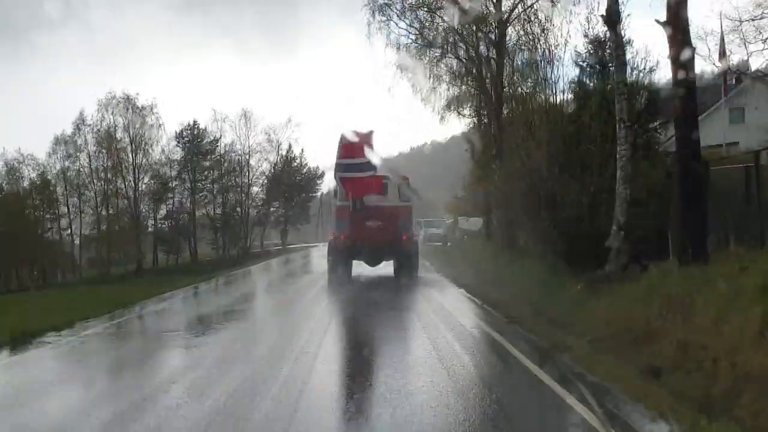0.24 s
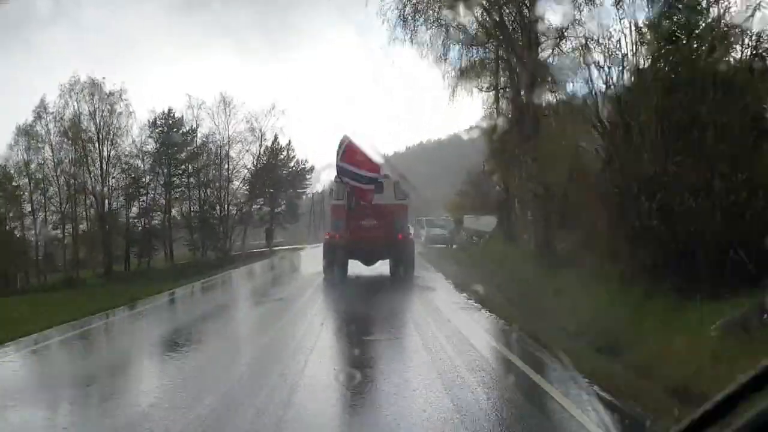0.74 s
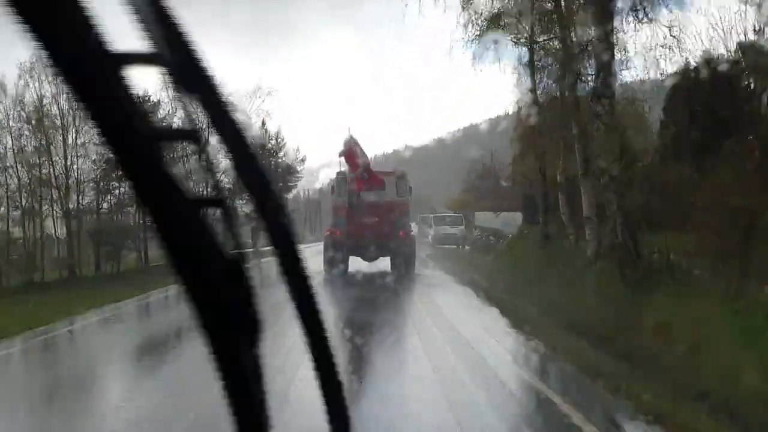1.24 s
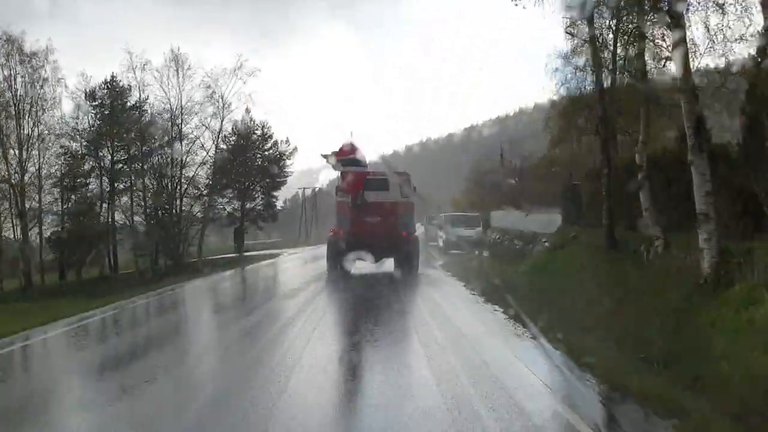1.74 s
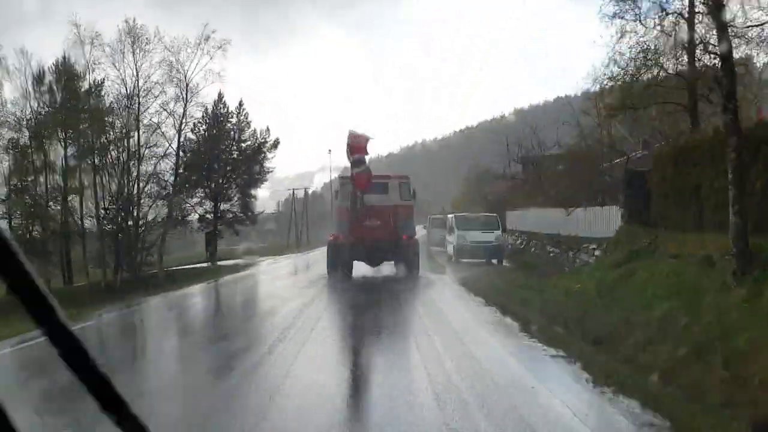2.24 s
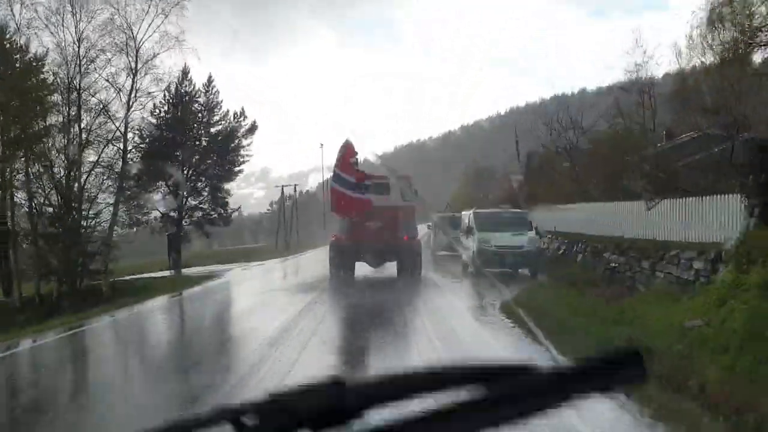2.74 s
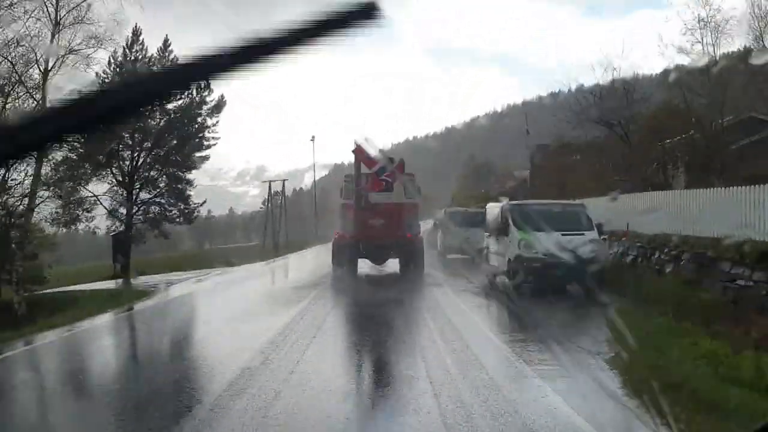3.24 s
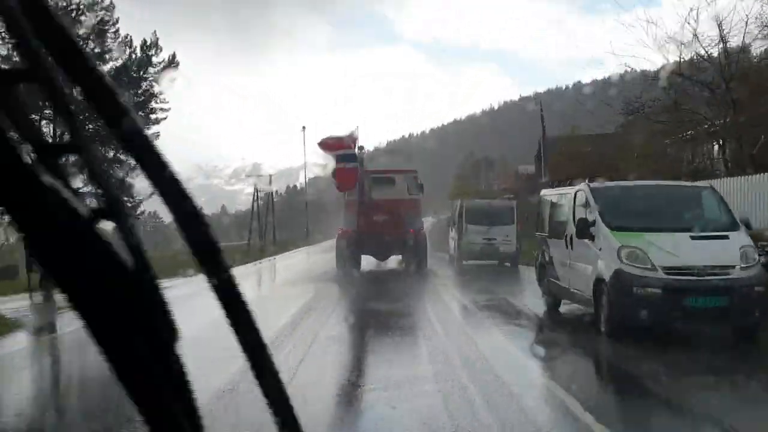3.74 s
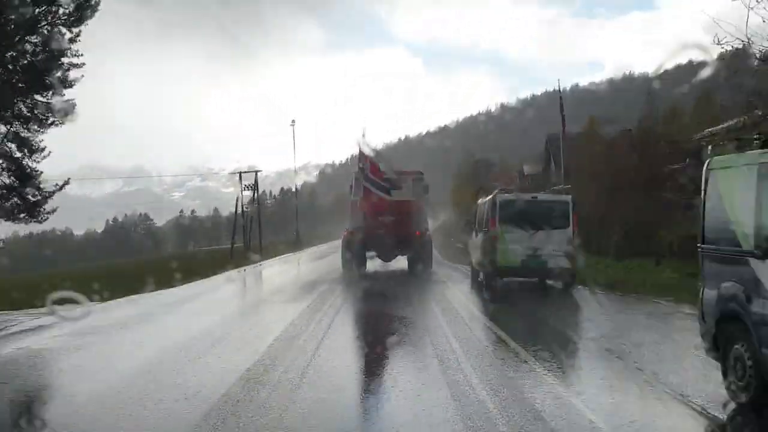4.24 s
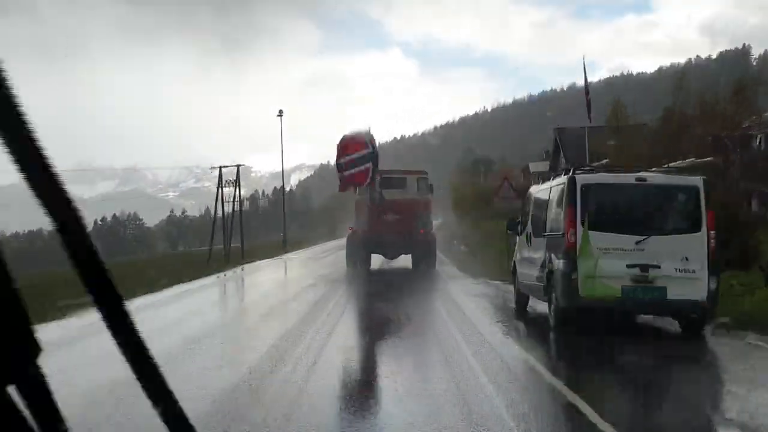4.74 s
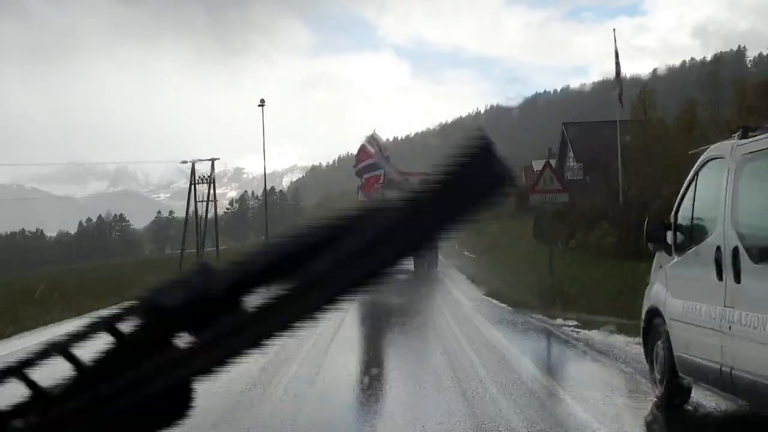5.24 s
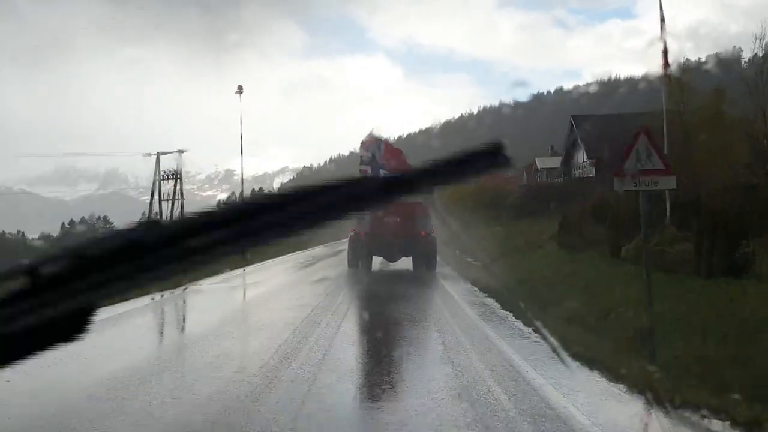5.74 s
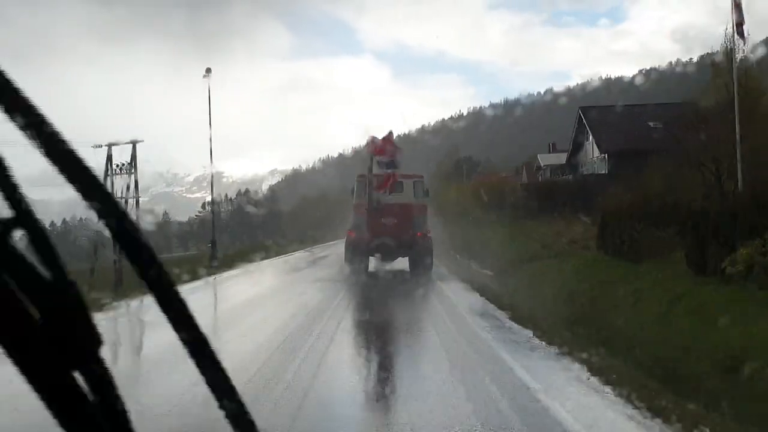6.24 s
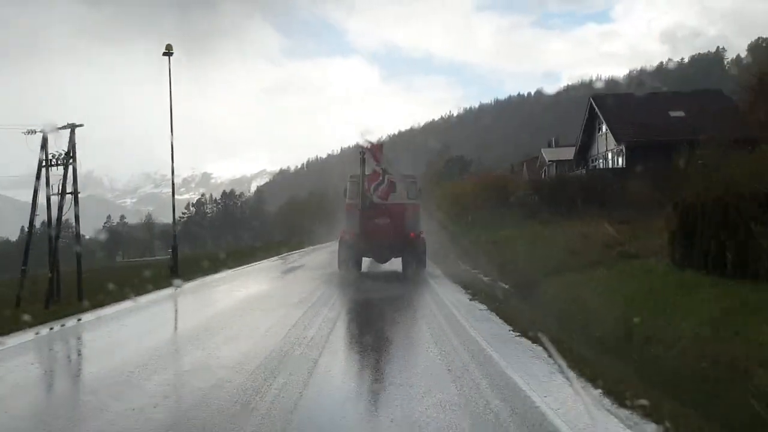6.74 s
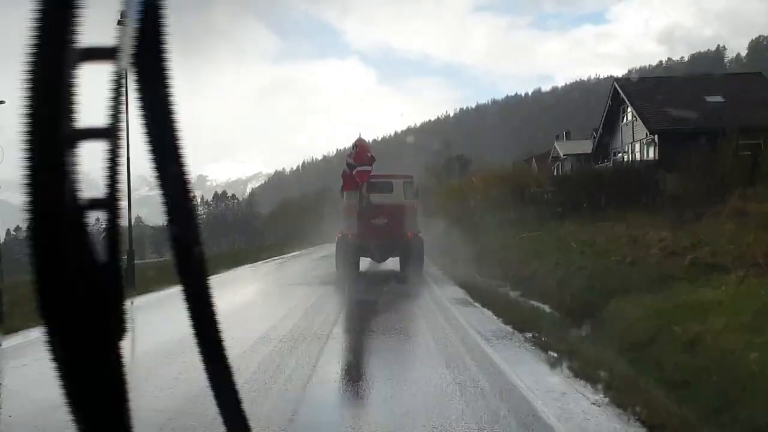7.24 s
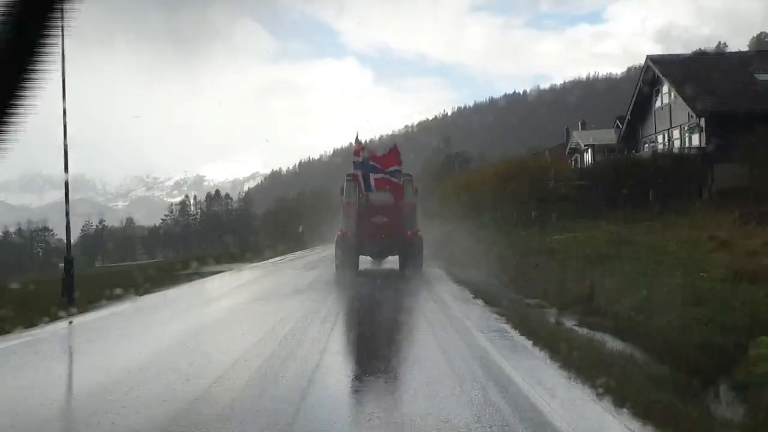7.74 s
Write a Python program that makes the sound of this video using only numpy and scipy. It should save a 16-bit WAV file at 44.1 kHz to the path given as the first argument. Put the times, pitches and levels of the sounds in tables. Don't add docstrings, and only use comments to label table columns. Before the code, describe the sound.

Rain patters and clicks on a car's windscreen above deep tyre roar and bump thuds, with rubbery wiper shudders and dull knocks repeating.

```python
import sys
import numpy as np
from scipy import signal
from scipy.fft import rfft, irfft
from scipy.io import wavfile
from scipy.ndimage import uniform_filter1d

SR = 44100
rng = np.random.default_rng(int(sys.argv[2]) if len(sys.argv) > 2 else 0)


def wav_record(signal):
    frames = np.transpose(np.atleast_2d(signal))
    bounded = np.clip(frames, -1, 1)
    quanta = np.round(bounded * 32767).astype(np.int16)
    wavfile.write(sys.argv[1], SR, quanta)


def volts(x):
    e = np.asarray(x, float) / 20
    return 10 ** e


N = 352800
TIME, FREQ = np.arange(N) / SR, np.fft.rfftfreq(N, 1 / SR) + 1

# pitch_hz, likeness [-1 to 1]
MIC_LIKENESS = [(60, 1), (130, 0.84), (290, 0.9), (640, 0.3), (1410, -0.24), (3100, 0.026), (6820, -0.071),
                (15000, 0.027)]
# pitch_hz, left_minus_right_db
MIC_LEAN = [(60, 1), (110, 3.5), (200, 0.5), (380, 2.5), (700, 1.5), (1290, 1.5), (2380, 2.5), (4400, 4.5),
            (8120, -1), (15000, -3.5)]
# start_s, firing_rate_hz, level_db
ENGINE = [
    (0, 71.9, -43),
    (3.3, 71.3, -39),
    (3.55, 72.9, -33.5),
    (4.5, 72.4, -23.5),
    (5.6, 71.6, -24),
    (6.5, 73.64, -23.5),
    (7.0, 72.84, -24),
    (7.3, 75.4, -35),
    (8, 74.5, -35),
]
# multiple, level_db
ENGINE_ORDERS = [(1, -2), (2, -16.5)]
# start_s, pitch_hz
BOOM_PITCH = [(0, 59.5), (.5, 60.5), (1.1, 65), (2, 64), (2.6, 61.5), (3.3, 65.5), (4, 63), (4.7, 61),
              (5.7, 65), (6.3, 62), (7.2, 62), (7.6, 64), (8, 62)]
# start_s, peak_db, hold_s
BUMPS = [(0, -21, 0.079), (0.15, -23, 0.1), (0.387, -16.5, 0.04), (0.54, -20, 0.04), (0.67, -21, 0.26),
         (1.0, -30, 0.082), (1.277, -13.5, 0.019), (1.75, -28, 0.21), (1.993, -14.5, 0.029),
         (2.271, -20.5, .01), (2.427, -28, .01), (2.554, -18.5, .02), (2.865, -18.5, 0.043),
         (3.21, -23, 0.025), (3.258, -19, 0.12), (3.747, -24, 0.36), (4.35, -27, 0.023),
         (4.525, -14, 0.0077), (4.706, -25.5, 0.38), (5.073, -21, 0.0092), (5.353, -19.5, 0.044),
         (5.691, -14.5, 0.024), (5.874, -18.5, 0.14), (6.21, -27, 0.33), (6.598, -26, 0.35),
         (7.04, -19, 0.23), (7.292, -22.5, 0.24)]
# pitch_hz, level_db [dB per Hz]
ROAD_COLOUR = [(15, -59), (25, -24), (46, -9.5), (63, -5), (75, -8.5), (86, -7.5), (101, -15.5), (135, -14),
               (168, -21.5), (205, -13), (243, -24.5), (376, -22), (545, -29), (613, -28.5), (983, -36),
               (1400, -42.5), (1820, -46.5), (3080, -120)]
# start_s, level_db
TYRE_LOAD = [(0.0, -33.5), (1.2, -31.5), (1.6, -33), (1.98, -30.5), (2.2, -32.5), (2.45, -33), (2.7, -33),
             (3.08, -33.5), (3.3, -30), (3.7, -34.5), (4.05, -34), (4.42, -31), (5.3, -33), (5.77, -31.5),
             (6.75, -33), (7.02, -31.5), (7.55, -32.5), (8.0, -33)]
# start_s, level_db
SHOWER = [(0.0, -44), (0.31, -47), (0.44, -43.5), (2.23, -43.5), (2.47, -41), (3.12, -45), (3.96, -48),
          (4.84, -45), (5.1, -48.5), (5.61, -44.5), (6.51, -46), (6.91, -44), (7.24, -46.5), (7.64, -44.5),
          (8.0, -47)]
# pitch_hz, level_db [dB per Hz]
RAIN_COLOUR = [(760, -12), (1300, -1), (2320, -1.5), (2950, -2), (4780, -5), (6830, -11.5), (8890, -23.5),
               (11300, -16.5), (13400, -18.5), (15200, -19), (16000, -38)]
# pitch_hz, t60_s
DROP_T60 = [(1500, 0.2), (4000, 0.076), (11000, 0.055)]
# start_s, peak_db, ring_hz, treble_minus_peak_db
GLASS_DROPS = [(0.065, -29, 2810, -16), (0.23, -26.5, 2980, -33), (0.2753, -25, 3230, -18),
               (0.2977, -25.5, 3000, -20), (0.3298, -23, 2030, -27), (0.4419, -27, 2120, -19),
               (0.5134, -23.5, 2750, -12), (0.6739, -23, 3970, -32), (0.7045, -26, 2990, -32),
               (0.7612, -28, 2266, -32), (0.8604, -26, 3010, -20), (0.932, -27, 2600, -20),
               (1.04, -21, 2630, -18), (1.2142, -26, 2900, -23), (1.2825, -25, 3720, -25),
               (1.3344, -28, 4290, -26), (1.3768, -46, 2910, -16), (1.5083, -25.5, 2490, -19),
               (1.5748, -30, 3690, -15), (1.6182, -25.5, 3000, -30), (1.7257, -20, 2680, -13),
               (1.8991, -28, 2960, -23), (1.933, -28.5, 2860, -18), (2.2638, -30.5, 3100, -17),
               (2.3219, -19, 2110, -20), (2.7043, -27, 2970, -15), (2.8409, -28, 2790, -14),
               (2.8726, -29, 2730, -23), (3.177, -27, 3210, -17), (3.457, -22, 3120, -24),
               (3.8085, -28.5, 2020, -16), (4.5805, -33, 2710, -24), (4.5925, -26.5, 2050, -23),
               (4.7331, -31.5, 2700, -14), (5.0764, -29.5, 3012, -16), (5.7728, -26, 4640, -29),
               (6.0831, -32, 2450, -26), (6.182, -24.5, 2850, -22), (6.7131, -24.5, 4590, -18),
               (6.8029, -26, 4340, -19), (7.1751, -21.5, 2140, -23)]
# start_s, peak_db, treble_minus_peak_db
ROOF_DROPS = [(0.316, -25.5, -12), (1.1854, -30, -9), (1.408, -27, -12), (2.166, -26, -26),
              (3.261, -29, -11), (3.391, -28, -26), (3.704, -30, -28), (4.2168, -26.5, -21),
              (4.6966, -28, -9), (5.666, -22, -35), (5.8376, -21, -24), (6.822, -30, -7)]
# start_s, peak_db
MORE_GLASS_DROPS = [(.2613, -31), (1.149, -31), (1.563, -36), (1.7679, -35), (1.7998, -28.5), (.408, -38),
                    (2.284, -31), (2.3057, -40), (2.395, -30), (2.9844, -31.5), (3.34, -34), (3.5974, -30),
                    (3.8725, -29), (4.146, -31.5), (4.338, -31.5), (4.537, -32), (4.779, -31), (4.878, -28),
                    (5.5258, -38), (5.906, -28), (5.9377, -28.5), (6.928, -30.5), (7.237, -33), (7.574, -33),
                    (7.898, -33)]
# start_s, peak_db, upper_modes_minus_peak_db
KNOCKS = [(0.322, -22, -33), (0.549, -13.5, -20.5), (1.807, -16.5, -17.5), (2.246, -37, -23),
          (3.068, -14, -18.5), (3.721, -21, -17), (3.775, -16.5, -24), (4.327, -13.5, -19.5),
          (5.595, -17.5, -15), (5.991, -43, -29), (6.229, -25, -10), (6.861, -14.5, -18), (7.017, -17, -20),
          (7.569, -17.5, -23)]
# pitch_hz, level_db, swell_s
KNOCK_MODES = [(124.3, 2, 0.0063), (184.4, -11, 0.018), (313.3, 5.5, 0.0046), (585, -6.5, 0.0029)]
# start_s, pitch_hz, level_db, hold_s
SQUEAKS = [(0.903, 597, -38, .02), (1.114, 850, -36, .02), (1.105, 1650, -44, .01),
           (1.108, 2000, -44, .012), (1.146, 2330, -43, 0.013), (2.338, 2190, -43, 0.018),
           (2.383, 1566, -43, 0.027), (3.09, 1625, -43, 0.018), (3.258, 900, -30, 0.0071),
           (3.261, 1100, -38, .01), (3.623, 612, -34, .055), (3.62, 1570, -46, 0.059),
           (3.667, 1800, -37, .025), (4.911, 2298, -44, 0.035), (4.913, 843, -37, 0.043),
           (6.128, 2250, -44, .01), (7.4, 2250, -43, 0.008)]
# start_s, peak_db,
# groan_minus_peak_db, film_hiss_minus_peak_db
SCRAPES = [(0.904, -32, -4, -12), (0.9134, -31, -9, -5), (0.9294, -32, -13, -4), (1.0947, -21, -4, -19),
           (1.106, -22, -7, -15), (1.129, -28.5, 4, -19), (1.1465, -23, 1, -17), (1.1564, -30, 1, -16),
           (1.1694, -33, 8, -11), (2.3284, -27, -1, -7), (2.341, -22, -2, -16), (2.3524, -33, -4, -17),
           (2.3674, -33, 1, -15), (2.3814, -27, -2, -14), (2.3944, -30, 2, -12), (2.4074, -29.5, 7, -12),
           (2.4214, -32, -1, -6), (2.4344, -34, 10, -6), (3.0964, -29.5, -8, -7), (3.2584, -31, -3, -8),
           (3.2625, -28, -5, -5), (3.582, -30, 0, -18), (3.5962, -24, 1.5, -16), (3.6064, -28, -9, -11),
           (3.6194, -28.5, -1, -11), (3.6404, -29, -7, -18), (3.6531, -27, -6, -24),
           (3.6634, -27.5, -9, -20), (3.6804, -26.5, 1.5, -19), (3.7014, -32.5, 4.5, -12),
           (4.8628, -20.5, 4, -22), (4.8738, -20, 2.5, -23), (4.8934, -20, 1, -13), (4.9104, -18, 1, -17),
           (4.9294, -21, 3.5, -14), (4.9554, -29.5, 5.5, -11), (6.1185, -27, 2.5, -20),
           (6.1324, -27, -6, -14), (6.1484, -33, 11, -18), (6.165, -22, 4, -16), (6.1734, -22, 5, -11),
           (6.1894, -23.5, -4, -23), (6.2034, -26, -1, -18), (6.2154, -29, 6, -17), (6.2304, -38, 8, -11),
           (7.1634, -26, -2, -4), (7.1714, -27, 2.5, -1), (7.3854, -32, 2, -18), (7.3943, -22.5, 2.5, -26),
           (7.4074, -24, -3, -23), (7.4303, -21, 3.5, -10), (7.4424, -22, 2.5, -15),
           (7.4604, -25, 3.5, -19), (7.4734, -27.5, -1, -17), (7.4864, -31, 4.5, -8)]
# pitch_hz, width_hz, level_db
ARM_MODES = [(235, 82, 11.5), (295, 75, 0), (447, 78, 3.5), (566, 230, -1)]
# pitch_hz, width_hz, level_db
GLASS_MODES = [(850, 33, 3), (1180, 67, -2), (1900, 15, -12), (2300, 39, -18), (2900, 53, -12),
               (4060, 50, -45), (4130, 66, -21)]


def curve(table):
    s, *columns = np.transpose(table)
    return [np.interp(TIME, s, column) for column in columns]


def over_hz(table, hz=FREQ):
    f, value = np.transpose(table)
    return np.interp(np.log(hz), np.log(f), value)


def unit(x):
    return x / np.sqrt(np.mean(x ** 2))


def hump(hz, octaves, f=FREQ):
    return np.exp(-(np.log2(f / hz) / octaves) ** 2)


def modes(table):
    return sum(volts(db) / (1 + ((FREQ - hz) / width * 2) ** 2) for hz, width, db in table)


def hiss(gain):
    alike = np.clip(over_hz(MIC_LIKENESS), -.99, .99)
    mid, side = rfft(rng.standard_normal((2, N))) * gain * np.sqrt([1 + alike, 1 - alike])
    return irfft([mid + side, mid - side], N)


def walk(rate):
    k = int(SR / rate)
    steps = np.repeat(rng.standard_normal(N // k + 1), k)
    return 1.4 * uniform_filter1d(uniform_filter1d(steps, k), k)[:N]


def lag(x, seconds):
    keep = np.exp(-1 / (seconds * SR))
    return signal.lfilter([1 - keep], [1, -keep], x)


def fade(hits, t60, rise=0.00034):
    return lag(signal.lfilter([1], [1, -volts(-60 / (t60 * SR))], hits), rise)


def engine():
    hz, db = curve(ENGINE)
    phase = 2 * np.pi * np.cumsum(hz * (1 + 0.0029 * walk(12))) / SR
    out = 0
    for multiple, order_db in ENGINE_ORDERS:
        level = volts(db + order_db + 1.56 * walk(11.0))
        out = out + level * np.sqrt(2) * np.sin(multiple * phase)
    return out


def bumps():
    rise_db_s, fall_db_s, rest_db = 212, 129, -37.5
    power = volts(rest_db) ** 2
    for s, db, hold in BUMPS:
        before, after = np.maximum(s - TIME, 0), np.maximum(TIME - s - hold, 0)
        power = power + volts(db - rise_db_s * before - fall_db_s * after) ** 2
    return np.sqrt(power)


def boom():
    width_hz, steady_share, evenness = 2.2, 1.42, 0.96
    narrow = 1 / (1 + (FREQ / width_hz) ** 2)
    drift = hiss(narrow) + 1j * hiss(narrow)
    drift = (drift.mean(axis=0) + 0.13 * drift) / np.abs(drift).mean() + steady_share
    carrier = np.exp(2j * np.pi * np.cumsum(curve(BOOM_PITCH)[0]) / SR)
    tone = drift / (np.abs(drift) + 0.13) ** evenness * carrier
    octave = volts(-15) * unit((tone ** 2).real)
    floor_pan = volts(-11.5) * unit(hiss(hump(84.7, 0.08)))
    return (unit(tone.real) + octave + floor_pan) * bumps() * volts(-2.2)


def road():
    swell, colour = walk(1.85), volts(over_hz(ROAD_COLOUR))
    load = curve(TYRE_LOAD)[0]
    load = load - load.mean()
    out = 0
    for hz in 30 * 2. ** np.arange(7):
        level_db = 0.3 * swell + 1.45 * walk(11)
        if hz > 90:
            level_db = level_db + load
        out = out + hiss(colour * hump(hz, 0.72)) * volts(level_db)
    return unit(out) * volts(-26)


def patter(rate=420, scatter_db=5.5, tint_db=5.0, lean_db=3.5, bed_db=-1.5):
    chance = rng.random((6000, 2))
    tint = rng.standard_normal((6000, 6)).T
    at = np.cumsum(-np.log(chance[:, 0]) * SR / rate).astype(int)
    heard = at < N
    size_db = np.minimum(-scatter_db * np.log(chance[:, 1]), 11)
    lean = np.array([tint[5], -tint[5]]) * lean_db
    out, colour, gust = 0, volts(over_hz(RAIN_COLOUR)), walk(14)
    for k, hz in enumerate([1000, 2000, 4000, 7500, 13000]):
        hits = np.zeros((2, N))
        power = volts(size_db + tint_db * tint[k] + lean) ** 2
        np.add.at(hits, (slice(None), at[heard]), power[:, heard])
        splash = unit(np.sqrt(fade(hits, .5 * over_hz(DROP_T60, hz) * 0.55, rise=0.00078)))
        bed = volts(bed_db + 2.3 * walk(7) + 0.13 * gust)
        out = out + hiss(colour * hump(hz, 0.99)) * np.sqrt(splash ** 2 + bed ** 2)
    return unit(out) * volts(curve(SHOWER)[0] + 3.5)


def big_drops():
    roof_hz, more_glass_hz, more_glass_treble_db = 4440, 2820, -14
    glass_mix_db, roof_mix_db = (-8, -3.5), (-5, -5.5)
    detune, pan_db, spread_db = .025, 2.2, 4
    rows = [(s, db, hz, top + 7.3, glass_mix_db) for s, db, hz, top in GLASS_DROPS]
    rows += [(s, db, roof_hz, top, roof_mix_db) for s, db, top in ROOF_DROPS]
    rows += [(s, db, more_glass_hz, more_glass_treble_db, glass_mix_db) for s, db in MORE_GLASS_DROPS]
    spots = rng.standard_normal((len(rows), 2))
    return [(s, db, hz * (1 + detune * a), top, mix, pan_db + spread_db * b)
            for (s, db, hz, top, mix), (a, b) in zip(rows, spots)]


def drops(echo_s=0.0073, echo_db=-22.0):
    out, t = np.zeros((2, N + 2048)), np.arange(2048) / SR
    f = np.fft.rfftfreq(2048, 1 / SR) + 1
    lead = 128
    bending = .003 * (2 * np.sqrt(2000 * f) - f * np.sqrt(.4))
    spread = np.exp(-2j * np.pi * (bending + f * lead / SR))
    end_fade = np.clip((t[-400] - t) / 0.019, 0, 1)
    for s, db, hz, top_db, (ring_db, body_db), pan_db in big_drops():
        burst = 0
        # centre_hz, width_octaves, level_db, crack_db
        layers = [(hz, .2, ring_db, 7.0), (4000, .9, body_db, 6.0),
                  (1600, .6, body_db - 5.5, -3.0), (12500, .55, top_db - 3.0, 15.0)]
        for centre, octaves, gain_db, crack_db in layers:
            is_panel = centre < 8000
            crack_t60, rise = (.01, .0014) if is_panel else (.005, .0004)
            noise = unit(irfft(rfft(rng.standard_normal((2, 2048))) * hump(centre, octaves, f)))
            crack = volts(crack_db - 60 * t / crack_t60)
            echo = volts(echo_db) * is_panel * np.interp(t - echo_s, t, crack, left=0)
            shape = volts(-60 * t / over_hz(DROP_T60, centre)) + crack + echo
            burst = burst + volts(gain_db) * noise * shape * np.minimum(t / rise, 1)
        i = int(s * SR) - lead
        burst = irfft(rfft(burst * end_fade) * spread)
        out[:, i:i + 2048] += burst * volts(db - 9.5 + np.array([[pan_db], [-pan_db]]) / 2)
    return out[:, :N]


def knocks(detune=0.0633, tail_db=-13.5, tail_s=0.12):
    out, t = np.zeros(N + 8192), np.arange(8192) / SR
    for s, db, upper_db in KNOCKS:
        i = int(s * SR)
        for (hz, mode_db, swell), chance in zip(KNOCK_MODES, rng.standard_normal(4)):
            blow = t / swell * np.exp(1 - t / swell)
            hum = volts(tail_db) * np.minimum(t / swell, 1) * np.exp(-t / tail_s)
            ring = np.sin(2 * np.pi * hz * (1 + detune * chance) * t)
            level = volts(db + mode_db - 4.5 + (upper_db + 11.0) * (hz > 250))
            out[i:i + 8192] -= level * (blow + hum) * ring
    return out[:N]


def squeaks(rise_s=0.0075, tail_s=0.0089):
    out, t = np.zeros((2, N + 8192)), np.arange(8192) / SR
    wobble, grain = walk(90), walk(70)
    for (s, hz, db, hold), turn in zip(SQUEAKS, rng.random((len(SQUEAKS), 2, 1))):
        i = int(s * SR)
        pitch = hz * (1 + 0.02 * wobble[i:i + 8192])
        phase = 2 * np.pi * (np.cumsum(pitch) / SR + turn)
        shape = np.minimum(t / rise_s, 1) * np.exp(-np.maximum(t - hold, 0) / tail_s)
        out[:, i:i + 8192] += volts(db + 3.4 * grain[i:i + 8192]) * shape * np.sqrt(2) * np.sin(phase)
    return out[:, :N]


def scrapes(slip_rate=450, slip_db=3.5, rise_s=.002, hold_s=0.011, tail_s=.009):
    slips = (rng.random(N) < slip_rate / SR) * volts(slip_db * rng.standard_normal(N))
    grip = unit(unit(fade(slips, .03)) + 2.2)
    groan = unit(hiss(modes(ARM_MODES)))
    broad = hump(1380, 1.423) * (FREQ / 1000) ** -.15 * volts(-3.0)
    rasp = unit(hiss(broad + volts(-14.5) * hump(2370, 0.47) + modes(GLASS_MODES)) * grip)
    film = unit(hiss(hump(4530, 0.43)) * grip)
    power, t = np.zeros((3, N + 8192)), np.arange(8192) / SR
    shape = np.minimum(t / rise_s, 1) * np.exp(-np.maximum(t - hold_s, 0) / tail_s)
    for s, db, groan_db, film_db in SCRAPES:
        i = int(s * SR)
        level = volts(db - 6.5 + np.array([[.3], [groan_db + 4.0], [film_db - 1.5]]))
        power[:, i:i + 8192] += (level * shape) ** 2
    power[1] = lag(power[1], 0.0044)
    rasp_gain, groan_gain, film_gain = np.sqrt(power[:, :N])
    return rasp_gain * rasp + groan_gain * groan + film_gain * film


def scene():
    return engine() + boom() + road() + patter() + drops() + knocks() + squeaks() + scrapes()


def band_limit(x):
    return signal.sosfilt(signal.butter(12, 15950, fs=SR, output="sos"), x)


def record(dry):
    lean = over_hz(MIC_LEAN) / 2
    mix = irfft(rfft(dry) * volts(np.array([lean, -lean])), N)
    return band_limit(mix)


dry = scene()
out = record(dry)
wav_record(out)
```